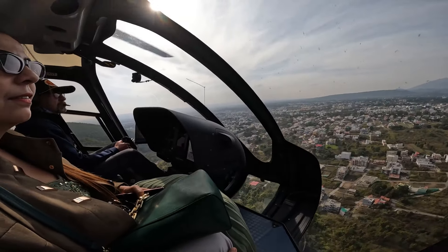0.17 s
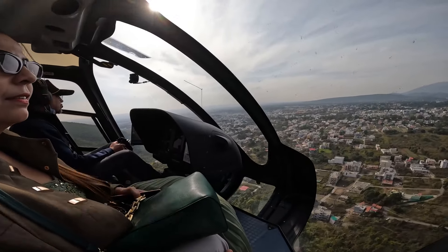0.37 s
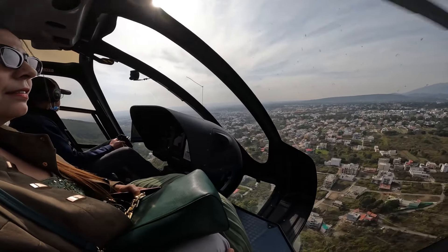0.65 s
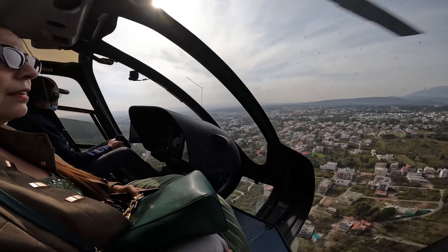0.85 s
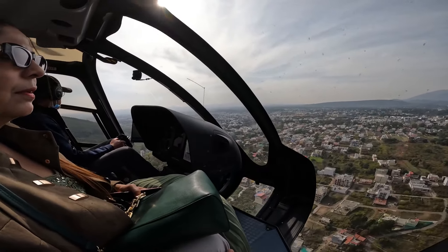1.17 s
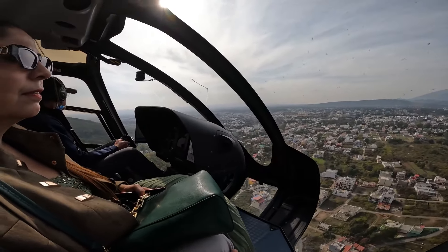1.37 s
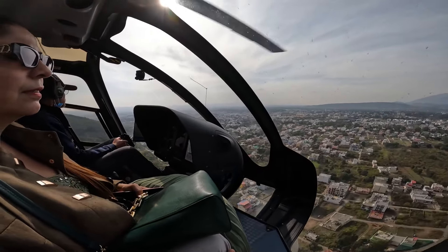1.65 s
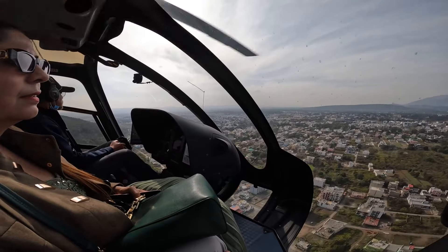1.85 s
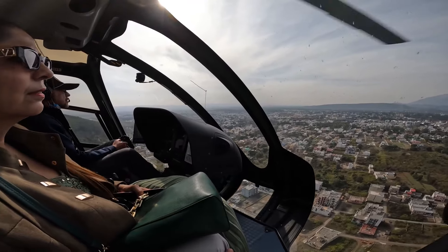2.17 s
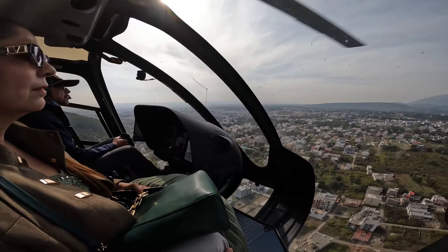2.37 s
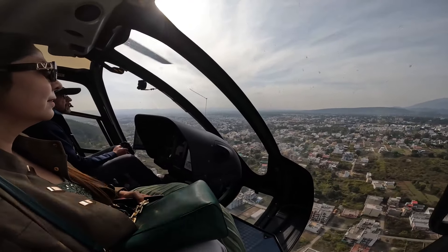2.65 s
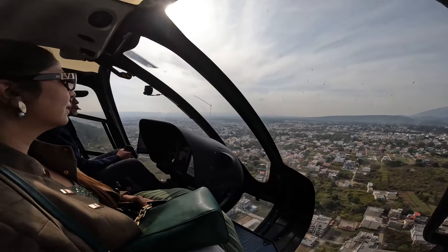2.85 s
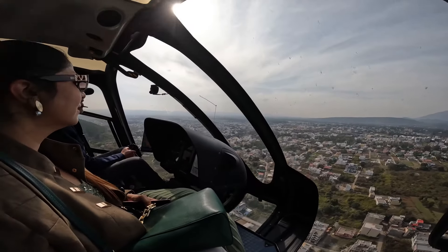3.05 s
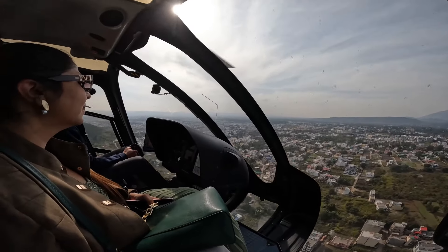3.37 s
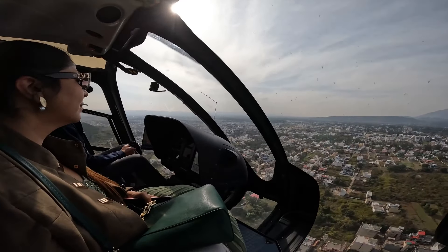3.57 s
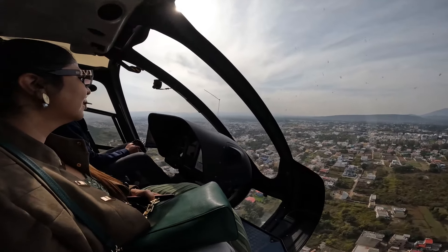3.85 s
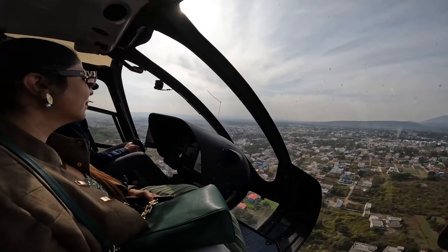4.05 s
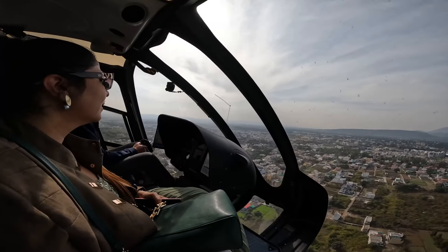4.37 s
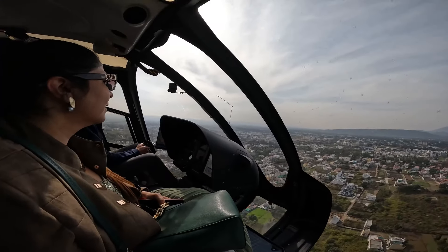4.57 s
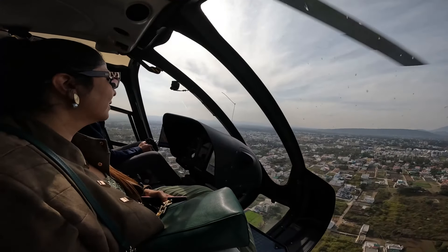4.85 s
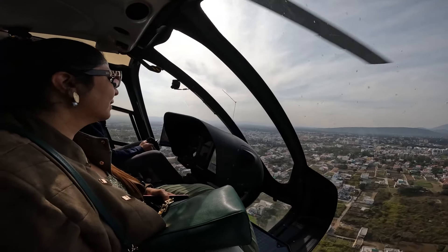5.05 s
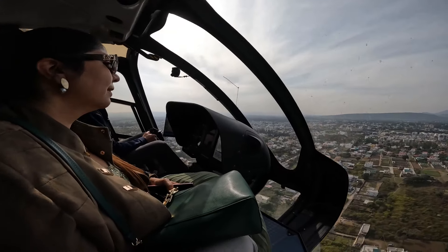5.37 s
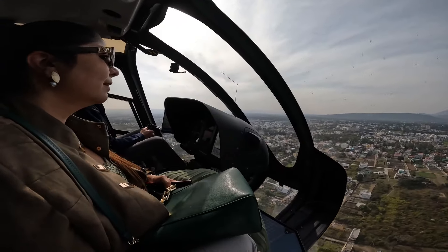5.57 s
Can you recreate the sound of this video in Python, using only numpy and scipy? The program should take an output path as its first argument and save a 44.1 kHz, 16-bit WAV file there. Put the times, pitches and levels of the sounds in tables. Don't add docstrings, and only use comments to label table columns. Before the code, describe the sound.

Constant heavy helicopter drone heard from a passenger seat: fast low blade beats, booming wind, broadband roar, thin gear whine and tiny chattering.

```python
import sys
import numpy as np
from scipy import signal
from scipy.fft import rfft, irfft, next_fast_len
from scipy.io import wavfile
from scipy.ndimage import uniform_filter1d, minimum_filter1d, map_coordinates

SR = 44100
rng = np.random.default_rng(int(sys.argv[2]) if len(sys.argv) > 2 else 0)


def invert_db(level):
    return 10 ** (np.asarray(level, dtype=float) / 20)


def bounce(signal):
    frames = np.transpose(np.atleast_2d(signal))
    limited = np.clip(frames, -1, 1)
    pcm = np.round(limited * 32767).astype(np.int16)
    wavfile.write(sys.argv[1], SR, pcm)


N = 251811

# time_s, rate_hz
BLADE_RATE = [
    (0, 19.7),
    (4.4, 19.7),
    (5.0, 19.8),
    (5.71, 19.83),
]


def blade_turns():
    rate_hz = curves(BLADE_RATE)[0]
    return np.cumsum(rate_hz) / SR


BLADE_LAG = [(1, -.15), (2, .12), (3, .52), (4, .26), (5, .35)]
# level_db, change_over_swing_db, change_over_bank_db
BLADE_LEVELS = [
    (-27.2, 0, 6),
    (-16.1, -1.9, -4.6),
    (-33.8, 6.5, 1.5),
]


def blades():
    first_db, second_db, third_db = [flown(*row) for row in BLADE_LEVELS]
    fifth_db = flown(-41, swing_db=6)
    levels_db = [
        first_db,
        second_db + 0.5 * wobble(4.32),
        third_db + 1.9 * wobble(3.0),
        third_db - 8 + 3 * wobble(2.62),
        fifth_db + 3 * wobble(2.5)]
    turns = blade_turns()
    beat = 0
    for (order, lag_turns), level_db in zip(BLADE_LAG, levels_db):
        beat = beat + invert_db(level_db) * np.cos(2 * np.pi * (order * turns - lag_turns))
    return invert_db(0.2) * beat


# time_s, depth_db, half_length_s
LULLS = [(0.037, 16, 0.078), (.37, 11.5, 0.049), (0.93, 11, .07), (1.56, 8, .05), (1.87, 12, 0.11),
         (2.527, 13, .1), (2.843, 6, 0.045), (3.69, 7, 0.043), (4.32, 17, 0.042), (4.95, 5.5, 0.11),
         (5.175, 13, 0.045), (5.447, 3, 0.045)]


def tail_shaft():
    t = np.arange(N) / SR
    hum_db = flown(-26.5, swing_db=3)
    for time_s, depth_db, half_s in LULLS:
        hum_db = hum_db - depth_db * np.exp(-((t - time_s) / half_s) ** 2)
    shaft_turns = 5.184 * blade_turns() + .04 * wobble(4)
    return invert_db(hum_db) * np.cos(2 * np.pi * shaft_turns)


def rotor():
    return np.sqrt(2) * (blades() + tail_shaft()) * invert_db([[.1], [-.1]])


# freq_hz, density_db_per_hz
BOOM_SPECTRUM = [(8, -38), (18, -30), (35, 4.5), (70, -2), (100, 1), (180, -2), (220, -3.5), (280, -5.5),
                 (400, -14.5), (600, -28.5), (900, -120)]


def slipstream():
    swell_db = 1.0 * np.cos(2 * np.pi * blade_turns() + .1)
    level_db = flown(-24, swing_db=2.5, bank_db=2) + 1.53 + swell_db + 0.7 * wobble(4.06)
    return invert_db(level_db) * rush(BOOM_SPECTRUM, patchy_db=.5, strand_db=1.12)


# freq_hz, density_db_per_hz
ROAR_SPECTRUM = [(210, -41), (350, -3.5), (800, -8.5), (1190, -8.5), (1520, -11.5), (1850, -15.5),
                 (2500, -17.5), (4920, -25), (7000, -33), (8920, -44), (11700, -45), (13300, -50),
                 (14300, -58), (15700, -63)]


def engine_roar():
    swell_db = 0.1 * np.cos(2 * np.pi * blade_turns() + .5)
    level_db = flown(-31.5, swing_db=1.1, bank_db=0.8) + 0.33 + swell_db + 0.17 * wobble(5.32)
    return invert_db(level_db) * rush(ROAR_SPECTRUM, patchy_db=0.1, strand_db=1.1)


# time_s, level_db
TURBINE = [
    (0, -66),
    (1.6, -67),
    (2.3, -69),
    (3.5, -62),
    (4, -65.5),
    (5.4, -66),
    (5.71, -62),
]


def turbine_hiss():
    swell_db = .5 * np.cos(2 * np.pi * blade_turns() - 1.2)
    hiss = filtered(rng.standard_normal(N), lambda hz: peak(hz, centre_hz=10800, width_hz=1500) ** 2)
    return invert_db(curves(TURBINE)[0] - 1 + swell_db) * unit(hiss)


# mesh_multiple, left_db, right_db, right_lag_turns
GEARS = [
    (1, -49, -57, .4),
    (2, -56, -60, .1),
    (2.644, -58, -64, .45),
    (4, -65, -70, .1),
    (5, -64, -66, .45),
]


def gears():
    mesh_turns = 656.8 * np.arange(N) / SR + 0.069 * wobble(2.65)
    whine = 0
    for multiple, left_db, right_db, lag_turns in GEARS:
        left = invert_db(left_db) * np.sin(2 * np.pi * multiple * mesh_turns)
        right = invert_db(right_db) * np.sin(2 * np.pi * (multiple * mesh_turns - lag_turns))
        whine = whine + invert_db(2.5 * wobble(1.74)) * np.array([left, right])
    return whine


# time_s, level_db
SHAKE = [
    (0, -64),
    (.86, -66),
    (1.2, -64),
    (2.9, -66),
    (3.5, -63),
    (3.9, -64),
    (4.8, -68),
    (5.71, -67),
]
# time_s, peak_db
KNOCKS = [(0.0957, -54), (0.1196, -47), (0.1491, -47), (0.1715, -47), (0.2638, -47), (0.2763, -48),
          (0.3197, -48), (0.5776, -50), (0.629, -49), (0.9862, -43.5), (1.034, -49), (1.0844, -44),
          (1.4386, -52), (1.5953, -46), (1.6442, -48), (1.7903, -49), (1.9475, -54), (2.0004, -46),
          (2.5102, -48), (2.5576, -48), (2.8045, -48), (2.8639, -48), (2.9622, -47), (3.0639, -49),
          (3.1163, -47), (3.1378, -49), (3.1637, -47), (3.2879, -51), (3.3174, -52), (3.5748, -47)]


def taps():
    turns = blade_turns()
    half = np.arange(int(2 * turns[-1]))
    chance = rng.standard_normal((len(half), 2))
    place_turns = half / 2 + .33 + .05 * chance[:, 0]
    at = np.searchsorted(turns, place_turns).clip(0, N - 1)
    strength_db = curves(SHAKE)[0] + flown(9, swing_db=-3)
    tap_db = strength_db[at] - 3.5 * (half % 2) + 4 * chance[:, 1]
    knock_s, knock_db = np.transpose(KNOCKS)
    places = np.append(at, (knock_s * SR).astype(int))
    return np.bincount(places, invert_db(np.append(tap_db, knock_db)), N)[:N]


# freq_hz, width_hz, level_db
FITTING_RING = [
    (11380, 380, -2),
    (11970, 450, 2),
    (12550, 450, -7),
]


def fitting():
    t = np.arange(SR // 50) / SR
    burst_shape = (t / 0.0026) ** 2 * np.exp(2 - 2 * t / 0.0023)
    bursts = signal.fftconvolve(taps(), burst_shape)[:N]
    shake = .5 + .5 * np.cos(2 * np.pi * (2 * blade_turns() - .8))
    buzz = invert_db(curves(SHAKE)[0] - 1.0 + 2.1 * wobble(30)) * (.7 + 0.63 * shake ** 3)

    def ring_gain(hz):
        return sum(invert_db(db) * np.abs(peak(hz, centre, width)) ** 1.9 for centre, width, db in FITTING_RING)

    ring = unit(filtered(rng.standard_normal((2, N)), ring_gain))
    near = (invert_db(-3.0) * bursts + buzz) * ring[0]
    far = buzz * ring[1]
    return near * invert_db([[.1], [-12]]) + far * invert_db([[-30], [-9]])


# time_s, swing_0_to_1
CAMERA_SWING = [
    (0, 0.4),
    (2.3, 0.02),
    (2.9, 0.54),
    (4.2, 0.78),
    (5.71, 0.6),
]


def camera_swing():
    return curves(CAMERA_SWING)[0]


# time_s, bank_0_to_1
BANK = [
    (0, 0),
    (4.4, 0),
    (4.8, .2),
    (5.2, .55),
    (5.71, 1),
]


def flown(level_db, swing_db, bank_db=0):
    return level_db + swing_db * camera_swing() + bank_db * curves(BANK)[0]


# freq_hz, width_hz, before_swing_db, after_swing_db
PANELS = [(180, 44, -3, -4), (250, 15.4, 5.5, 0.5), (302, 15, -2, -1), (409, 42, -2, 1.5),
          (508.6, 36, -5.5, 3), (657, 73, 0.5, -8), (928, 50, -.5, 4), (986, 113, -0.5, 1),
          (1440, 90, 0, 6), (1591, 68, 7, 2.5), (2020, 60, -14, 0), (2670, 270, -15, -1),
          (3500, 230, -5.5, -3), (4970, 250, -2.5, -13)]
# freq_hz, width_hz, depth_0_to_1
NULLS = [(72, 6.5, 0.2), (100.4, 8.7, 0.39), (217.7, 10.4, 0.33), (271.5, 8.6, 0.23), (415, 13, 0.34),
         (838, 58, 0.31), (1205, 85, 0.16), (2410, 270, 0.22)]


def panels(hz, column):
    def bell(centre_hz, width_hz):
        return 1 / (1 + (2 * (hz - centre_hz) / width_hz) ** 2)

    power = 1 + sum(invert_db(2 * panel[column]) * bell(panel[0], panel[1]) for panel in PANELS)
    nulls = [1 - np.clip(depth, 0, .9) * bell(centre, width) for centre, width, depth in NULLS]
    return np.sqrt(power) * np.prod(nulls, axis=0)


# freq_hz, likeness_0_to_1
ALIKE = [(60, 0.99), (150, 1), (280, 0.99), (420, 0.95), (560, 0.78), (950, 0.91), (1300, 0.77),
         (1600, 0.85), (2200, .7), (3500, 0.76), (5000, 0.83), (8000, 0.57), (10500, 0.58), (13800, .15),
         (15500, .5)]
# freq_hz, lead_rad
LEAD = [(200, 0.0094), (400, -0.38), (680, 0.2), (1200, -0.63), (1450, -0.23), (1750, -0.44), (3000, -0.66),
        (3800, -0.5), (6000, -0.16)]
# freq_hz, difference_db
LEAN = [(150, 0), (260, 0.5), (540, -1), (950, 2.5), (1450, -1), (1950, 2), (3500, -0.3), (7500, 2),
        (10800, 4.5)]


def ports(hz):
    spread = np.arccos(np.clip(along(ALIKE, hz), 0, 1)) / 2
    tilt = invert_db(along(LEAN, hz) / 2) * np.exp(.5j * along(LEAD, hz))
    left = [np.cos(spread) * tilt, np.sin(spread) * tilt]
    right = [np.cos(spread) / tilt, -np.sin(spread) / tilt]
    return np.array([left, right])


def rush(spectrum, patchy_db, strand_db):
    z = signal.stft(rng.standard_normal((2, N)), nperseg=1024)[2]
    field_db = patchy_db * patches(z.shape[1:], bins=10, frames=8)
    field_db = field_db + strand_db * patches(z.shape[1:], bins=2, frames=40)
    pair = signal.istft(z * invert_db(field_db), nperseg=1024)[1][:, :N]
    heard = filtered(pair, lambda hz: invert_db(along(spectrum, hz)) * ports(hz)).sum(axis=1)
    before, after = filtered(heard, lambda hz: np.array([[panels(hz, column=2)], [panels(hz, column=3)]]))
    swing = camera_swing()
    return unit((1 - swing) * before + swing * after)


def patches(shape, bins, frames):
    across = uniform_filter1d(rng.standard_normal(shape), bins, axis=0)
    return unit(uniform_filter1d(across, frames, axis=1))


def unit(x):
    return x / np.sqrt(np.mean(x ** 2) + 1e-20)


def along(points, hz):
    f, v = np.transpose(points)
    return np.interp(np.log(hz + 1), np.log(f + 1), v)


def curves(rows):
    s, *cols = np.transpose(rows)
    return [np.interp(np.arange(N) / SR, s, c) for c in cols]


def wobble(rate):
    knots = rng.standard_normal(int(N * rate / SR) + 4)
    return map_coordinates(knots, [np.arange(N) * rate / SR])


def filtered(x, response):
    m = next_fast_len(N + SR // 2)
    return irfft(rfft(x, m) * response(np.fft.rfftfreq(m, 1 / SR)), m)[..., :N]


def peak(hz, centre_hz, width_hz):
    return 1j * hz * width_hz / (centre_hz ** 2 - hz ** 2 + 1j * hz * width_hz)


def scene():
    air = slipstream() + engine_roar() + turbine_hiss()
    return rotor() + air + gears() + fitting()


def top_cut(x):
    return signal.sosfilt(signal.butter(12, 15720, fs=SR, output="sos"), x)


def record(dry):
    bass = filtered(dry, lambda hz: 1 / (1 + (hz / 400) ** 2))
    swing = np.abs(bass).max(axis=0)
    need = (1 + (swing / 0.37) ** 4.0) ** (-1 / 3.6)
    gain = uniform_filter1d(minimum_filter1d(need, size=133), size=133)
    held = gain * bass + gain ** 0.27 * (dry - bass)
    offset = .0052 - held.mean()
    return top_cut(invert_db(0.88) * held + offset)


dry = scene()
out = record(dry)
bounce(out)
```